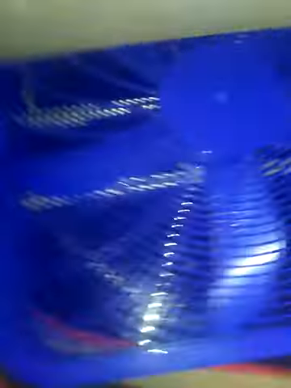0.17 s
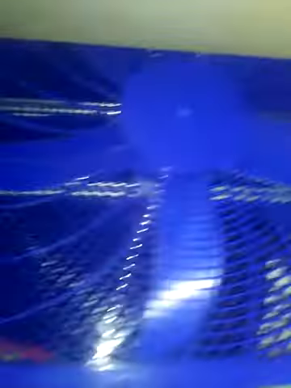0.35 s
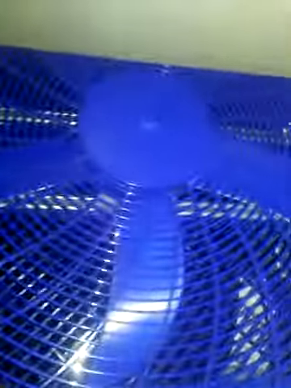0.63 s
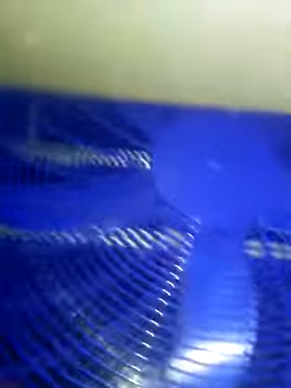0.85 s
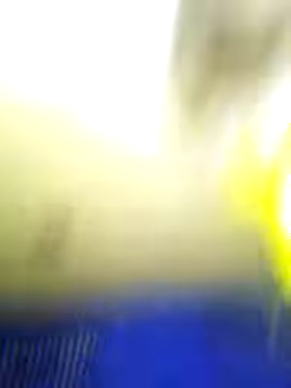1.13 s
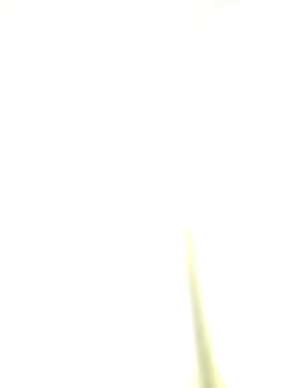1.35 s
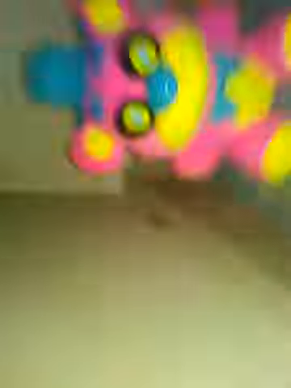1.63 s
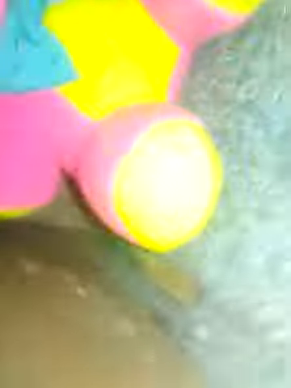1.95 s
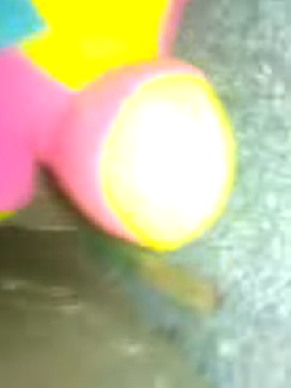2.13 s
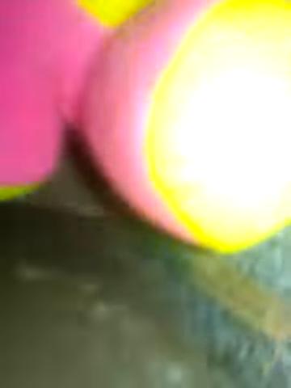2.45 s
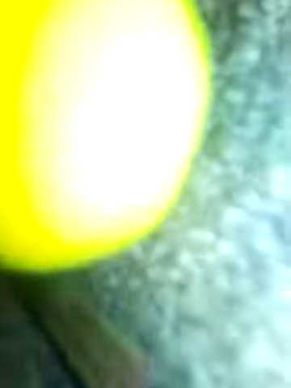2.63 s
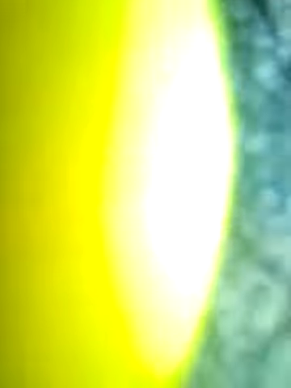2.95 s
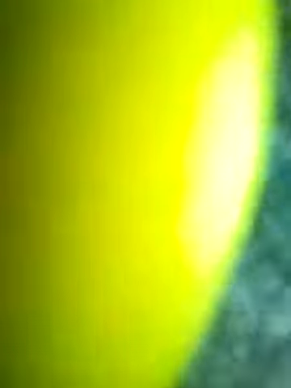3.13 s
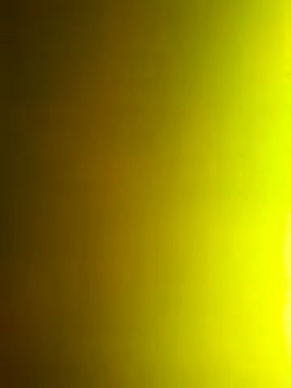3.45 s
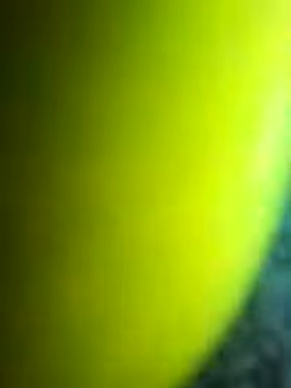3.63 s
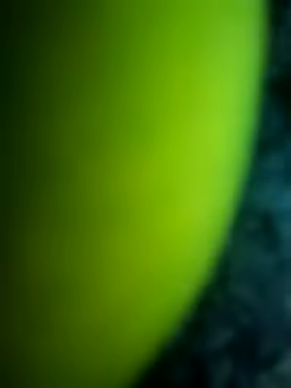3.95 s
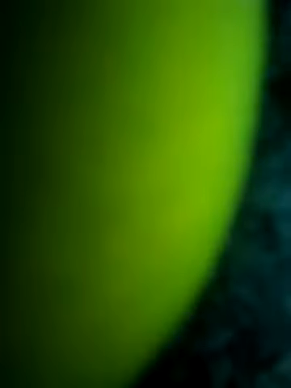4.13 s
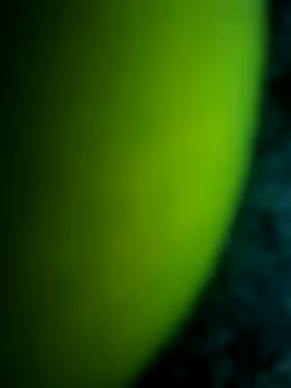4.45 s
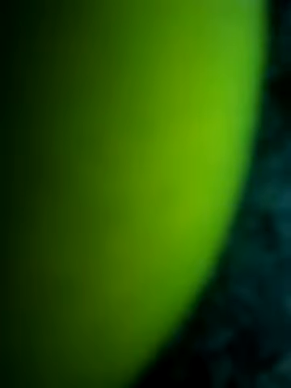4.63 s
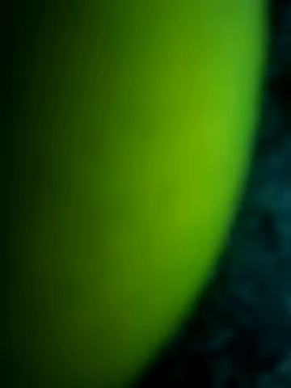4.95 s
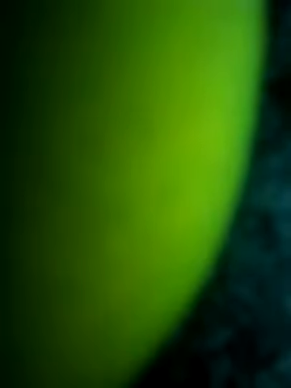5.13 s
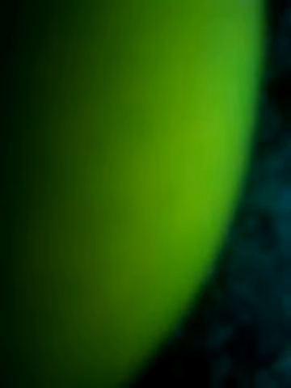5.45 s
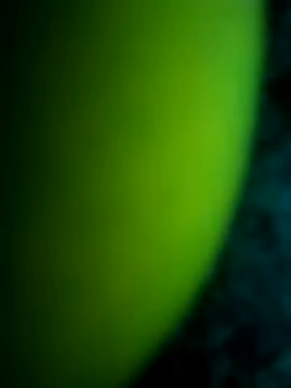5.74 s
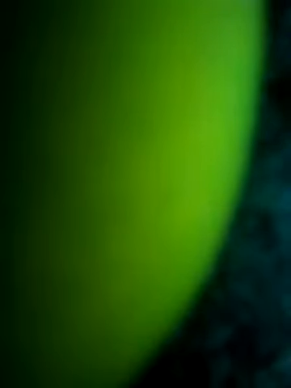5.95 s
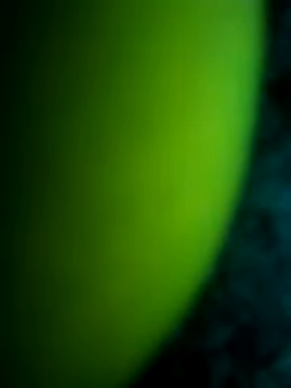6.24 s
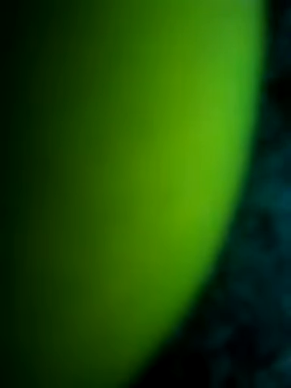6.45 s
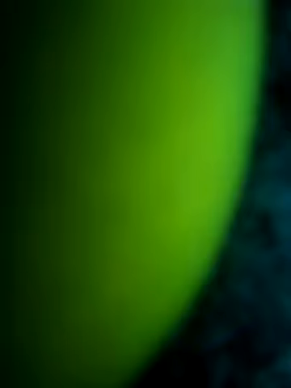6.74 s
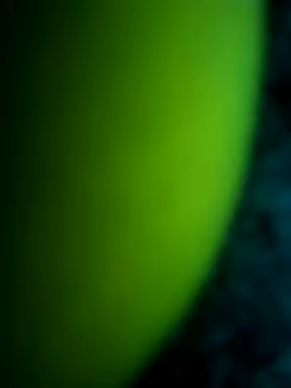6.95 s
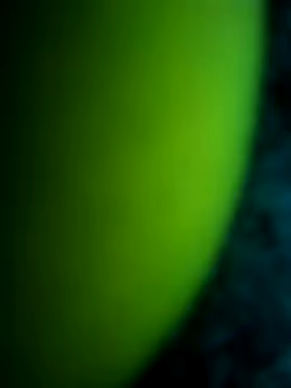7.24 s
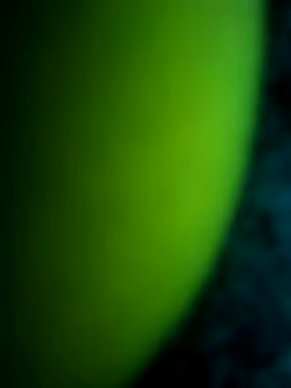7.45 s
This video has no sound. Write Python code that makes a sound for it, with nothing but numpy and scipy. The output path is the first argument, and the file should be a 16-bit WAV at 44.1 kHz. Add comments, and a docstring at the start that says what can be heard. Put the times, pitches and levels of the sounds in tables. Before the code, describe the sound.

Faint hiss and handling clacks, then fingers rub harshly over a microphone, a sharp pop, and later dull irregular knocks ending in one heavy thump.

```python
"""In a room, a small camera is carried along and set down against a plastic toy.
Fingers brush its case and slide over the microphone port (shaped noise); once they shut it with a pop.
Then the resting camera is nudged: light, dull knocks and one heavier thump, made of dying tones,
a soft thud and ticks of noise. The knocks get a short room tail, and a faint steady hiss lies under all."""
import sys
import numpy as np
from scipy import signal
from scipy.fft import rfft, irfft
from scipy.io import wavfile
from scipy.ndimage import uniform_filter1d

SR = 44100
rng = np.random.default_rng(int(sys.argv[2]) if len(sys.argv) > 2 else 0)


def wrap_up_sound(samples):
    """Save the sound to the file named by the first command line argument, as 16-bit audio."""
    columns = np.atleast_2d(samples).T
    # keep every value between -1 and 1, then stretch to whole-number steps
    tamed = np.clip(columns, -1, 1)
    steps = np.round(tamed * 32767).astype(np.int16)
    wavfile.write(sys.argv[1], SR, steps)


N = 334719  # length in samples

# Tone colour of skin sliding on the port: f/Hz, level per Hz/dB
SKIN_COLOUR = [(40, -14), (90, -6.5), (200, -6), (400, -2), (700, -4), (1400, -4.5), (2400, -4.5),
               (3500, -6), (4700, -4), (6300, -3.5), (8300, -2), (10000, -6.5), (13000, -10.5),
               (16000, -12.5)]


def amp(db):
    """Turns decibels into a gain."""
    return 10 ** (np.asarray(db) / 20)


def unit(x):
    """Scales a sound to an rms (average strength) of one."""
    return x / np.sqrt(np.mean(x ** 2) + 1e-20)


def read(points, hz):
    """Reads a table of values against frequency, in straight lines on a log-frequency axis."""
    f, value = np.transpose(points)
    return np.interp(np.log(hz + 1), np.log(f + 1), value)


def add(mix, s, sound):
    """Lays a sound into the mix at time s, in seconds."""
    part = mix[max(round(s * SR), 0):][:len(sound)]
    part += sound[:len(part)]


def swell_and_fade(t, start, end, swell, fade):
    """Stays at one between start and end, with an exponential rise before and fall after."""
    before = np.maximum(start - t, 0)
    after = np.maximum(t - end, 0)
    return np.exp(-before / swell - after / fade)


def noise(colour, size, weight_db=0, fizz_db=0, peak_hz=1000, peak_db=0):
    """Noise of a given spectrum, with a shelf at each end and one resonance, at an rms of one."""
    hz = np.fft.rfftfreq(size, 1 / SR)
    shelves_db = read([(330, weight_db), (650, 0), (7500, 0), (11000, fizz_db)], hz)
    octaves_off = np.log2((hz + 1) / peak_hz)
    hump_db = peak_db / (1 + (octaves_off / 0.5) ** 2)
    gain = amp(read(colour, hz) + shelves_db + hump_db)
    return unit(irfft(rfft(rng.standard_normal(size)) * gain, size))


def ring(modes, t, spread):
    """Dying tones of a struck body; each blow lands elsewhere and shifts their pitches a little."""
    shifts = 1 + spread * rng.uniform(-1, 1, len(modes))
    total = 0
    for (hz, db, t60), shift in zip(modes, shifts):
        total = total + amp(db - 60 * t / t60) * np.sin(2 * np.pi * hz * shift * t)
    return total


def background_hiss(level_db=-72.5):
    """A faint steady noise floor, fullest in the bass."""
    # f/Hz, level per Hz/dB
    floor_colour = [(25, -9.5), (45, -6), (70, -1), (140, -5.5), (200, -8.5), (400, -11), (650, -14.5),
                    (1200, -17.5), (3000, -18.5), (5000, -21), (10000, -20), (16000, -19.5)]
    return amp(level_db) * noise(floor_colour, N)


def room(x, delay=0.026):
    """A short diffuse tail that builds up over the delay (s); its bands die at their own speeds."""
    # How long the room rings: f/Hz, time to fall 60 dB/s
    decay_times = [(100, 0.49), (500, 0.27), (2000, 0.14), (12000, 0.4166)]
    hz, t, z = signal.stft(rng.standard_normal(SR // 2), SR, nperseg=256)
    fading = z * amp(-60 * t / read(decay_times, hz)[:, None])
    tail = signal.istft(fading, SR, nperseg=256)[1]
    tail *= 1 - np.exp(-(np.arange(len(tail)) / SR / delay) ** 2)
    return signal.fftconvolve(x, tail / np.linalg.norm(tail))[:N]


def brushing(scuff_s=0.25, scuff_db=-55, scuff_fade=0.04):
    """The hand's thin hiss on the case, and one short scuff of plastic."""
    # Hand on the case: f/Hz, level per Hz/dB
    case_colour = [(300, -12.5), (750, -7), (1100, -12.5), (2700, -9.5), (4000, -16), (5600, -13),
                   (7200, -2), (9000, 0), (11500, -3), (16000, -6.5)]
    # Scuffing plastic: f/Hz, level per Hz/dB
    scuff_colour = [(180, -42), (300, -12), (532, -2.5), (841, -19), (1290, -7), (1490, -20), (3670, -24),
                    (4850, -18), (6730, 0), (7420, -29), (9490, -0.5), (10600, -24), (15000, -37)]
    # One row a sweep of the hand: t at its height/s, level/dB, swell/s, fade/s
    sweep_rows = [ (.26, -58.5, .03, 0.045), (.45, -70.5, .4, .3), (.96, -68, .07, .08),
                  (1.24, -59.5, .22, .008), (1.36, -51.5, .017, 0.015), (1.49, -66.5, .04, 0.073),
                  (2.18, -52.5, 0.089, 0.084), (2.38, -58, 0.088, .03), (2.43, -49.5, 0.013, 0.013),
                  (3.06, -63, .08, .05), (4.16, -70, .05, .06), (4.73, -73, 0.093, .14),
                  (7.2, -73, 0.082, .17), (7.53, -66.5, .03, .08)]
    t = np.arange(N) / SR
    # the grip hisses steadily while the camera is carried
    held_from_s, held_to_s, held_db, let_go_s = 1.31, 3.92, -68.8, .09
    grip = amp(held_db) * swell_and_fade(t, held_from_s, held_to_s, let_go_s, let_go_s)
    sweeps = [amp(db) * swell_and_fade(t, s, s, swell, fade) for s, db, swell, fade in sweep_rows]
    hiss = np.linalg.norm([grip, *sweeps], axis=0) * noise(case_colour, N)  # levels add as powers
    distance_s = np.hypot(t - scuff_s, .005)  # rounds the top, about 1 dB under scuff_db
    scuff_level_db = scuff_db - distance_s / scuff_fade * 20 / np.log(10)
    return hiss + amp(scuff_level_db) * noise(scuff_colour, N)


def drag(s=3.157, level_db=-32, fade=0.07, length=0.1, judder_db=2.0):
    """The case judders along the toy: a rough, hollow rumble with a creak on top."""
    # f/Hz, level per Hz/dB
    drag_colour = [(60, -4.5), (130, -1.5), (230, 1.5), (350, -4.5), (520, -5.5), (800, -14.5), (1200, -18),
                   (1700, -29), (2350, -12), (2800, -25), (3300, -33), (4700, -26), (5800, -28),
                   (16000, -55)]
    out, t = np.zeros(N), np.arange(round(length * SR)) / SR
    wobble = unit(uniform_filter1d(rng.standard_normal(len(t)), size=200))
    rumble = unit(amp(judder_db * wobble) * noise(drag_colour, len(t)))
    soft_ends = signal.windows.tukey(len(t), .03)
    add(out, s, amp(level_db) * rumble * np.exp(-t / fade) * soft_ends)
    return out


def clack(centre_hz, t, focus_db=11, width=0.13, dense_db=-10, dense_fade=0.0054,
          rattle_db=-18, rattle_fade=0.033):
    """A blow favours the shell's tones near one pitch; a short rattle keeps exciting them."""
    # Tones of the hard shell: f/Hz, level/dB, time to fall 60 dB/s
    shell_modes = [(327, -1.5, .05), (462.2, -0.5, 0.034), (566.5, -8.5, 0.022), (703, 0, 0.035),
                   (936, -5, 0.0354), (1107, -1.5, 0.03984), (1590, -4, .03), (2350, -4.5, 0.022),
                   (3300, -5.5, .02), (4630, -10.5, .015)]
    modes = [(hz, db - focus_db * np.log2(hz / centre_hz) ** 2, t60) for hz, db, t60 in shell_modes]
    # the noise has a hump around each tone
    grid = np.geomspace(30, 16000, 200)
    power = sum(amp(db) ** 2 / (1 + (np.log(grid / hz) / width) ** 2) ** 2 for hz, db, t60 in modes)
    colour = np.column_stack([grid, 10 * np.log10(power + 1e-20)])
    dying = amp(dense_db) * np.exp(-t / dense_fade) + amp(rattle_db) * np.exp(-t / rattle_fade)
    return ring(modes, t, spread=.035) + dying * noise(colour, len(t))


def contact(t, shell_db, shell_hz, contact_db, clack_rise=0.00075, tick_fade=0.0051,
            clack_db=-3, tick_db=-4):
    """The hard shell ticks and clacks where it is touched."""
    # Tick of the contact: f/Hz, level per Hz/dB
    tick_colour = [(500, -23.5), (2000, -16), (3500, 1.5), (4500, -5.5), (6000, -2), (8000, 1),
                   (10000, 1.5), (12500, -10.5), (16000, -15)]
    tick = amp(contact_db + tick_db) * noise(tick_colour, len(t)) * np.exp(-t / tick_fade)
    shell = amp(shell_db + clack_db) * clack(shell_hz, t)
    return (tick + shell) * (1 - np.exp(-t / clack_rise))


def shell_clacks():
    """Clacks and ticks of the hard shell, alone or on top of a bump."""
    # One row a clack of the shell: t/s, clack level before the contact's trim/dB, clack centre f/Hz,
    # tick level before the contact's trim/dB
    clack_rows = [ (0.1812, -34.5, 570, -64), (.185, -45, 760, -51), (.2385, -51, 750, -45.5),
                  (.632, -63.5, 800, -58), (1.6555, -35, 620, -54), (3.171, -23.5, 3600, -40),
                  (3.184, -31.5, 3000, -37), (3.21, -38, 2400, -55), (3.2358, -32, 2360, -31),
                  (3.604, -41, 700, -56), (3.642, -29, 680, -48.5), (5.519, -40.5, 720, -58),
                  (5.89, -56.5, 790, -77), (5.951, -42, 640, -62), (6.003, -50.5, 1100, -68),
                  (6.05, -52, 1150, -83.5), (6.798, -50, 480, -78), (7.464, -32.5, 1150, -31)]
    out, t = np.zeros(N), np.arange(SR // 3) / SR
    for s, *blow in clack_rows:
        add(out, s, contact(t, *blow))
    return out


def bumps(lag=.005, swell=0.0067, deep_rise=0.0022, tick_share_db=0):
    """The shell makes contact; the weight follows as a soft thud and a deep ring, then drops back once."""
    # One row a bump of the whole camera: t/s, weight level/dB, thud f/Hz,
    # hardness of the contact (clack level against the weight, before the contact's trim)/dB
    bump_rows = [ (1.574, -44, 110, -21), (1.633, -34, 118, -22), (1.6547, -36.5, 84, -10),
                 (1.819, -34, 148.6, -12.5), (1.872, -51, 164, 2), (3.156, -22.5, 171, -7.5),
                 (3.184, -25, 121.3, -15), (3.21, -33.5, 165, -16), (3.2356, -38, 108.6, -9),
                 (3.258, -38, 139.4, -6), (4.42, -61.5, 264, -10), (5.169, -63.5, 145, -16),
                 (5.518, -45, 173, -1), (5.546, -52, 135, -6), (5.715, -63, 143, -16),
                 (5.914, -48.5, 144, -8), (5.951, -39.5, 160, -8), (5.964, -43, 91, -6),
                 (6.161, -39.5, 140, -14), (6.29, -43, 135, -11), (6.364, -58.5, 140, -18),
                 (6.64, -42.5, 133, -25), (6.703, -40, 139, -18), (6.731, -46.5, 145, -15.5),
                 (6.787, -34.5, 122, -33), (6.856, -39, 130, -15.5), (7.136, -59.5, 140, -8),
                 (7.305, -54, 140, -11), (7.4649, -19, 135, -14), (7.474, -22.5, 150, -11)]
    # The camera rocking on its support: f/Hz, level/dB, time to fall 60 dB/s
    rocking_modes = [(78.53, -1, .115), (95, -6.5, 0.11), (252.9, -19, .18), (343.5, -19.5, .11)]
    usual_bump_db, usual_thud_hz = -40, 145
    rock_base_db, rock_per_db, rock_db_per_octave = -2.5, 0.26, -22  # heavy, low bumps rock it most
    # a harder contact clacks higher and ticks much more
    clack_hz, hard_db_per_octave, tick_per_db = 674, 43, 1.8
    rebound_s, rebound_db = .027, -14.5
    out, t = np.zeros(N), np.arange(SR // 3) / SR
    for s, weight_db, thud_hz, hard_db in bump_rows:
        shell_hz = clack_hz * 2 ** (hard_db / hard_db_per_octave)
        tick_db = weight_db + tick_share_db + tick_per_db * hard_db
        shell = contact(t, weight_db + hard_db, shell_hz, tick_db)
        push = t / swell * np.exp(1 - t / swell)  # peaks at one after the swell time
        thud = amp(weight_db) * push * np.sin(2 * np.pi * thud_hz * t)
        octaves_up = np.log2(thud_hz / usual_thud_hz)
        rock_db = rock_base_db + rock_per_db * (weight_db - usual_bump_db) + rock_db_per_octave * octaves_up
        deep = amp(weight_db + rock_db) * ring(rocking_modes, t, spread=0.031) * (1 - np.exp(-t / deep_rise))
        add(out, s, shell)
        add(out, s + lag, thud + deep)
        add(out, s + lag + rebound_s, amp(rebound_db) * thud)
    return out


def port_pop(s=3.6564, spike_db=-3.8, spike_width=.00007, snap_db=-12, snap_fade=0.0013,
             swing_db=-5.0, swing_hz=165, swing_fade=0.0027):
    """A fingertip shuts the port: a sharp pressure spike flips over, then the trapped air swings back."""
    out, t = np.zeros(N), np.arange(SR // 8) / SR
    u = (t - .00025) / spike_width  # time from the flip, in spike widths
    spike = -amp(spike_db) * u * np.exp((1 - u ** 2) / 2)
    snap = amp(snap_db) * noise(SKIN_COLOUR, len(t), fizz_db=-9.0) * np.exp(-t / snap_fade)
    swing_shape = np.exp(-t / swing_fade) * (1 - np.exp(-t / 0.00022))
    swing = -amp(swing_db) * np.cos(2 * np.pi * swing_hz * t + .5) * swing_shape
    add(out, s, spike + snap)
    add(out, s + 0.00022, swing)
    return out


def port_rubbing(grain_db=1.5):
    """Skin rubs over the port: friction noise that follows the pressure of the finger."""
    # One row a stretch of rubbing (a light touch, a slide, a firm press or the fading end of a stroke):
    # start t/s, length/s, first level/dB, last level/dB,
    # bass shelf (full under 330 Hz)/dB, fizz shelf (full over 11 kHz)/dB
    rub_rows = [ (1.585, .026, -38, -44.5, 9.5, 10.5), (1.668, .067, -39.5, -30.3, -9, 6.5),
                (1.832, .048, -47, -50.5, 17, 6.5), (2.596, .016, -53, -49, -3, 3),
                (2.618, .036, -36, -30.3, -4.5, 1.5), (2.66, .03, -39.5, -40.5, -2.5, -.5),
                (2.715, .038, -29.5, -34, -10, 0), (2.807, .035, -46.5, -45, -5.5, -2),
                (2.838, .032, -27.5, -17.3, -7, -2), (2.874, .027, -14.7, -12.3, 3, -2),
                (3.054, .03, -55, -52, 8, -7), (3.16, .125, -55.5, -46, 11.5, -1),
                (3.324, .067, -28, -40.5, 1, 5), (3.413, .07, -38.7, -28.6, 0.5, 4.5),
                (3.513, .008, -39, -46.5, 2.5, 0), (3.531, .012, -37, -38, -2.5, 2.5),
                (3.565, .015, -38.5, -40, 0, -.5), (3.598, .045, -55, -50.5, 5.5, -3),
                (3.664, .071, -24.5, -37.3, -4, -4.5), (3.754, .085, -42.5, -46.5, 3.5, 3),
                (3.854, .008, -18.5, -17.5, -7, 3), (3.881, .032, -41, -46, 8, 2)]
    gap_hz, gap_db = 7300, 2  # resonance of the gap under the finger
    usual_rub_db = -38
    # a light touch lands quickly, a firm one builds
    press_s, press_s_per_db, slowest_press_s = .0042, .0003, .0062
    lift_s = .0056  # how fast the pressure eases at the end of a stretch
    # it trails off lightly afterwards, more after a firm end
    trail_base_db, trail_per_db, trail_db_per_s = -56.5, 0.2575, 125
    out, size = np.zeros(N), SR // 2
    t = np.arange(size) / SR - .1  # starts 0.1 s early, for the swell
    for s, length, first_db, last_db, weight_db, fizz_db in rub_rows:
        landing = np.clip(press_s + press_s_per_db * (first_db - usual_rub_db), .0015, slowest_press_s)
        level = amp(np.interp(t, [0, length], [first_db, last_db]))
        press = level * swell_and_fade(t, 0, length, landing, lift_s)
        trail_db = min(trail_base_db + trail_per_db * (last_db - usual_rub_db), last_db - 10.5)
        trail = amp(trail_db - trail_db_per_s * (t - length)) * (t > length)
        # the skin catches and slips
        catches = unit(uniform_filter1d(rng.standard_normal(size), size=40))
        friction = noise(SKIN_COLOUR, size, weight_db, fizz_db, gap_hz, gap_db)
        rubbing = unit(amp(grain_db * catches) * friction)
        add(out, s + t[0], np.maximum(press, trail) * rubbing)
    return out


def scene(bump_room_db=-16, rub_room_db=-32):
    """Bumps and clacks reach the room; rubbing, dragging and the pop at the port hardly do."""
    knocks = bumps() + shell_clacks()
    rubs = port_rubbing() + port_pop() + drag()
    echo = room(amp(bump_room_db) * knocks + amp(rub_room_db) * rubs)
    return (knocks + rubs + echo + brushing() + background_hiss())[None]


def record(dry, low_hz=58, edge_hz=15950):
    """The small microphone sheds deep bass and rests slightly off zero; then the top is cut off."""
    bass_cut = signal.butter(4, low_hz, "high", fs=SR, output="sos")
    thin = signal.sosfilt(bass_cut, dry) - .0004
    top_cut = signal.firwin(511, edge_hz, window=("kaiser", 9), fs=SR)
    return signal.oaconvolve(thin, top_cut[None], "same")


dry = scene()
out = record(dry)
wrap_up_sound(out)
```